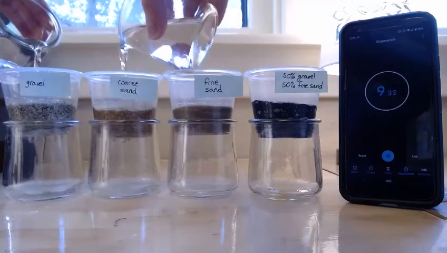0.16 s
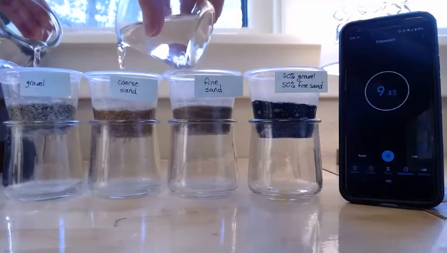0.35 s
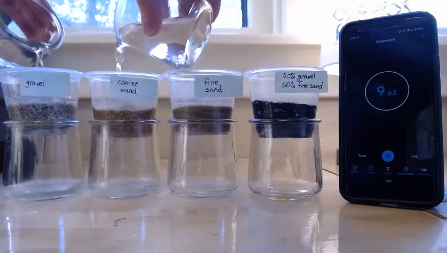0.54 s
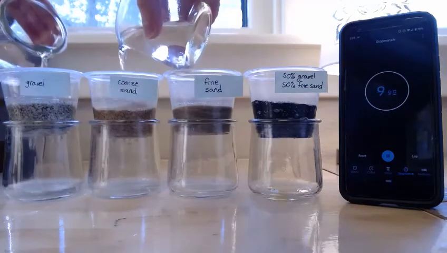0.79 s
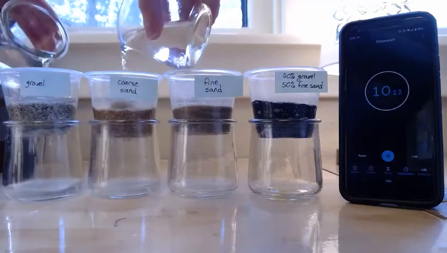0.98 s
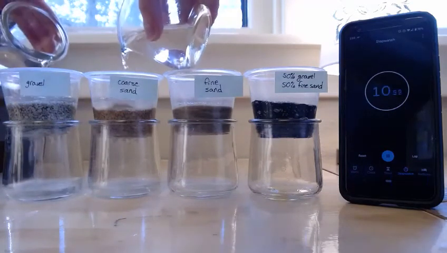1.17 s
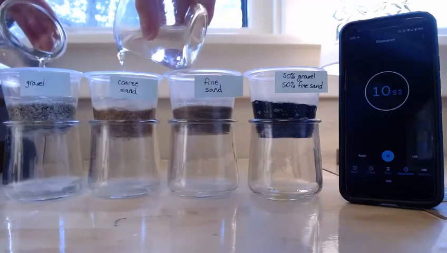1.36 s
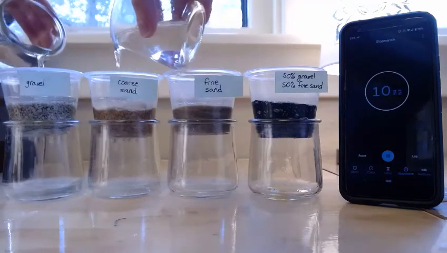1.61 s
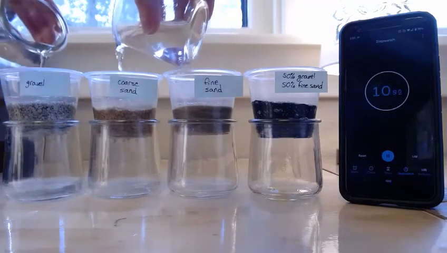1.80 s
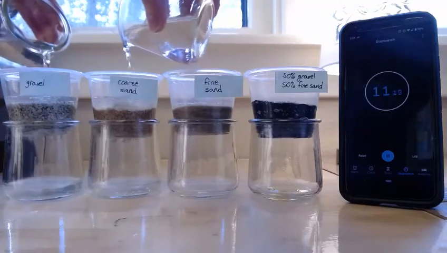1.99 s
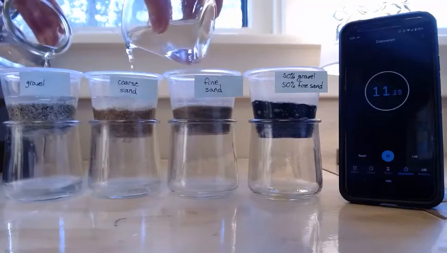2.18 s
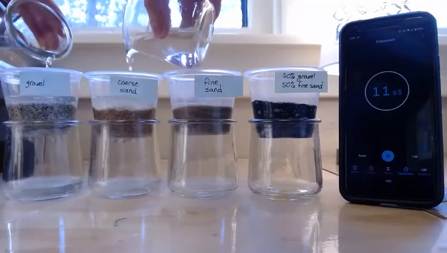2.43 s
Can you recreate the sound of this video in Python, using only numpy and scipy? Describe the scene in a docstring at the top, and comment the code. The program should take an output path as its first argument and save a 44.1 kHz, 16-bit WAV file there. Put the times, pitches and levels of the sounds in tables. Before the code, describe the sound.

Water trickles from small glass beakers onto gravel and sand in plastic cups. A few bright plops stand out, then softer drips follow and die away, close by in a small room with a faint hum.

```python
"""Thin streams of water are poured from beakers onto gravel and sand in plastic cups, close by, indoors.
From the start there are a faint appliance hum, a wavering low tone, an uneven rumble and room noise.
A trickle sets in: drops slap the surface and trap bubbles, which ring briefly and rise in pitch.
The loudest plops come near 0.3 s, 1.0 s and 1.2 s; softer ones follow and die out by 2.4 s.
A small hard room answers each one."""
import sys
import numpy as np
from scipy import signal
from scipy.fft import rfft, irfft, next_fast_len
from scipy.io import wavfile
from scipy.ndimage import uniform_filter1d

SR = 44100
rng = np.random.default_rng(int(sys.argv[2]) if len(sys.argv) > 2 else 0)


def generate_wav(sig):
    """Save sig (samples, or channels by samples) to the path in sys.argv[1] as 16-bit PCM at SR."""
    pcm = np.round(np.clip(np.atleast_2d(sig).T, -1, 1) * 32767).astype(np.int16)
    wavfile.write(sys.argv[1], SR, pcm)


N = 108045

# Spectrum of the steady room noise: f/Hz, relative density/dB
AIR_SPECTRUM = [(65, -11.5), (110, -1.5), (292, -3.5), (401, -9.5), (462, -7.5), (562, -12), (1270, -20.5),
                (1980, -17.5), (2440, -31), (6830, -39), (7600, -50), (9880, -69.5), (16700, -120)]
AIR_DB = -63


def amp(db):
    """The decibel scale: 20 dB is a tenfold amplitude."""
    return 10 ** (np.asarray(db) / 20)


def unit(x):
    """Normalisation to rms 1."""
    return x / np.sqrt(np.mean(x ** 2) + 1e-20)


def along(points, hz):
    """Interpolation of (f/Hz, value) points on a logarithmic frequency axis."""
    f, values = np.transpose(points)
    return np.interp(np.log(hz + 1), np.log(f + 1), values)


def curves(rows):
    """Linear interpolation in time: one value per sample for each column after t/s."""
    times, *columns = np.transpose(rows)
    return [np.interp(np.arange(N) / SR, times, column) for column in columns]


def filtered(x, response):
    """Linear filtering: the spectrum of x is multiplied by a frequency response."""
    size = next_fast_len(N + 8192)
    return irfft(rfft(x, size) * response(np.fft.rfftfreq(size, 1 / SR)), size)[..., :N]


def noise(spectrum):
    """Spectral shaping: coloured noise of rms 1 that falls away outside the given points."""
    closed = [(spectrum[0][0] * .5, -120), *spectrum, (spectrum[-1][0] * 2, -120)]
    return unit(filtered(rng.standard_normal(N), lambda hz: amp(along(closed, hz))))


def narrow(centre_hz, width_hz):
    """Resonance: noise in one narrow band is heard as an unsteady tone (rms 1)."""
    return unit(filtered(rng.standard_normal(N), lambda f: 1 / (1 + (2 * (f - centre_hz) / width_hz) ** 2)))


def lay(onsets, shapes):
    """Superposition: the rows of shapes add, each from its own onset in seconds."""
    at = np.round(onsets * SR).astype(int)[:, None] + np.arange(shapes.shape[1])
    return np.bincount(at.ravel(), shapes.ravel(), N + SR)[:N]


def appliance_hum():
    """Narrow-band noise: an appliance hums in two faint, unsteady tones."""
    # Hum tones: f/Hz, rms level/dB, bandwidth/Hz
    tones = [(457.5, -69, 9.9), (495.8, -73, 9)]
    return sum(amp(db) * narrow(hz, width_hz) for hz, db, width_hz in tones)


def wavering_tone():
    """Amplitude modulation: a low tone swells and fades."""
    # Envelope of the tone: t/s, level/dB
    envelope = [(0.0, -79.5), (0.49, -62.5), (0.5, -70.5), (1.23, -65.5), (1.28, -79), (1.46, -56),
                (1.49, -64.5), (1.64, -74.5), (1.92, -59), (2.19, -75), (2.29, -57), (2.45, -82)]
    return amp(curves(envelope)[0]) * narrow(centre_hz=297, width_hz=16)


def rumble():
    """Superposition of low Gaussian tone bursts and broad low noise makes an uneven rumble."""
    # Low swells: centre t/s, peak level/dB, f/Hz, half-width/s
    bursts = [(.05, -57, 58.4, 0.017), (.2, -58, 59.6, 0.016), (0.279, -48.5, 130, 0.022),
              (.39, -45.5, 56.5, 0.05), (0.501, -36, 58, 0.014), (0.662, -50, 77, 0.02),
              (0.831, -46.5, 132, 0.012), (0.822, -53.5, 60, .03), (0.959, -40, 50.6, 0.035),
              (1.081, -45.5, 58, 0.091), (1.201, -38, 54.2, 0.041), (1.26, -47.5, 94, 0.04),
              (1.381, -40, 78, 0.01), (1.478, -39.5, 59.8, 0.036), (1.569, -37.5, 58.2, 0.016),
              (1.699, -43.5, 95.7, 0.039), (1.829, -43, 67, 0.015), (1.971, -49.5, 53.3, 0.024),
              (2.06, -45.5, 69, 0.032), (2.238, -41.5, 58, 0.019), (2.369, -48, 61, 0.01)]
    # Spectrum of the low noise: f/Hz, relative density/dB
    spectrum = [(20, -5), (35, -7), (55, -1), (100, -1.5), (140, -7.5), (200, -16.5), (260, -41.5)]
    centre, db, hz, half_width = np.transpose(bursts)[:, :, None]
    t = np.arange(N) / SR - centre
    phase = 2 * np.pi * (hz * t + rng.random(centre.shape))
    swells = amp(db) * np.exp(-(t / half_width) ** 2) * np.sin(phase)
    return swells.sum(0) + amp(-54.5) * noise(spectrum)


def background_noise(flicker_db=4.5):
    """Random modulation: steady room noise gets a faint, watery flicker like that of compressed audio."""
    cells = signal.stft(noise(AIR_SPECTRUM), nperseg=512)[2]
    flicker = uniform_filter1d(rng.standard_normal(cells.shape), 3, axis=0)
    flicker = uniform_filter1d(flicker, 10, axis=1)
    return amp(AIR_DB) * signal.istft(cells * amp(flicker_db * unit(flicker)), nperseg=512)[1][:N]


def ring(onsets, db, hz, t60, size):
    """Bubble resonance: trapped air rings as a damped sine that starts softly and rises in pitch."""
    rise_per_t60, attack_s = 0.02, 0.0015
    t = np.arange(size) / SR
    hz, t60 = hz[:, None], np.clip(t60, .003, .036)[:, None]
    phase = 2 * np.pi * hz * (t + rise_per_t60 * t * t / (2 * t60))
    decay = amp(db[:, None] - 60 * t / t60)
    attack = 1 - np.exp(-(t / attack_s) ** 2)
    return lay(onsets, decay * attack * np.sin(phase))


def swarm(per_s, centre_hz, spread, t60_cycles, scatter_db):
    """A Poisson process of small bubbles with log-normal pitches, rms 1."""
    gap, radius, angle, strength = rng.random((3500, 4)).T
    onsets = np.cumsum(-np.log(1 - gap)) / per_s
    gaussian = np.sqrt(-2 * np.log(1 - radius)) * np.cos(2 * np.pi * angle)
    hz = centre_hz * np.exp(spread * gaussian)
    db = -scatter_db * np.log(1 - strength)
    heard = onsets < N / SR
    return unit(ring(onsets[heard], db[heard], hz[heard], t60_cycles / hz[heard], size=800))


def trickle():
    """Smaller bubbles resonate higher: three swarms make the trickle between the plops."""
    # Swarm envelopes: t/s, then relative level/dB of fizz, fine spray and small bubbles
    envelopes = [(0.0, -80, -75, -90), (0.17, -55.5, -67, -70), (0.2, -63.5, -72.5, -76),
                 (0.23, -60, -61.5, -67.5), (0.26, -85, -75, -63.5), (0.29, -49, -57, -65),
                 (0.33, -80, -65, -79.5), (0.4, -71, -83, -61), (0.6, -56, -55.5, -41.5),
                 (0.71, -87, -84.5, -84), (0.82, -64.5, -88.5, -55), (0.9, -71, -68, -59),
                 (0.95, -41.5, -56, -37), (0.96, -55.5, -97, -64.5), (0.97, -40, -40, -59),
                 (1.02, -52, -56, -63.5), (1.11, -53, -63, -56.5), (1.17, -92, -72, -63),
                 (1.19, -74, -67, -67), (1.21, -52, -57, -57), (1.24, -62, -69, -53), (1.27, -57, -58, -67),
                 (1.36, -53.5, -55, -46), (1.46, -64, -83.5, -68), (1.58, -57, -90, -52),
                 (1.73, -70, -83, -53), (1.75, -56, -77, -58), (1.86, -76, -73, -57),
                 (1.93, -68, -68, -45.5), (1.94, -79, -72, -38), (2.0, -66.5, -73, -55.5),
                 (2.1, -69, -70.5, -50.5), (2.15, -53, -51, -40.5), (2.27, -93, -92, -86),
                 (2.37, -60.5, -81, -75), (2.45, -74.5, -94, -77)]
    fizz_db, spray_db, small_db = curves(envelopes)
    small = swarm(per_s=400, centre_hz=1942, spread=.057, t60_cycles=30, scatter_db=6)
    fizz = swarm(per_s=1300, centre_hz=3300, spread=.2, t60_cycles=40, scatter_db=2)
    spray = swarm(per_s=1300, centre_hz=5700, spread=.17, t60_cycles=65, scatter_db=2)
    return amp(small_db - 11.5) * small + amp(fizz_db - 8.5) * fizz + amp(spray_db - 12.5) * spray


def plops():
    """Air entrainment: drops trap loud bubbles, and a brood of lesser ones breaks off each."""
    # Loud bubbles: t/s, relative level/dB, f/Hz, t60/s (ring caps it at 0.036 s)
    bubbles = [(0.0682, -59.5, 2210, 0.052), (0.1386, -51, 2010, 0.029), (0.157, -45, 1930, 0.023),
               (0.1775, -40, 1904, 0.019), (0.2134, -28.5, 1606, 0.018), (0.2284, -41, 1510, 0.035),
               (0.2493, -33, 1870, 0.021), (0.2713, -14.5, 1841, 0.021), (0.3174, -48.5, 2020, 0.02),
               (0.3274, -56, 1786, 0.019), (0.4264, -46, 1824, 0.033), (0.4868, -38, 1865, 0.021),
               (0.5028, -40, 2006, 0.021), (0.5686, -45, 1920, 0.027), (0.5955, -35.5, 2010, 0.03),
               (0.6365, -37, 1767, 0.022), (0.6804, -33, 1677, 0.015), (0.7971, -40, 1850, 0.024),
               (0.8295, -44.5, 1856, 0.025), (0.9433, -41, 2090, 0.028), (0.9547, -31, 2015, 0.028),
               (0.9722, -18.5, 1930, 0.014), (0.9884, -30.5, 1544, 0.018), (1.039, -26, 1460, 0.028),
               (1.0714, -43, 1627, 0.028), (1.0919, -35, 1814, 0.021), (1.1034, -43.5, 1665, 0.042),
               (1.2201, -36, 1410, 0.016), (1.2396, -18.5, 1437, 0.019), (1.2564, -27.5, 2010, 0.024),
               (1.2724, -47, 1260, 0.028), (1.2864, -41.5, 1160, 0.046), (1.3324, -36.5, 1170, 0.06),
               (1.3558, -32, 1977, 0.029), (1.4296, -50, 1265, 0.047), (1.5105, -46.5, 1640, 0.077),
               (1.5703, -42, 1582, 0.043), (1.6202, -51, 1595, 0.035), (1.6482, -40.5, 2037, 0.032),
               (1.6591, -52.5, 1584, 0.026), (1.7549, -51, 1540, 0.041), (1.8043, -53.5, 1486, 0.028),
               (1.8243, -49, 1453, 0.039), (1.8487, -49, 1886, 0.03), (1.8771, -51.5, 1770, 0.022),
               (1.9106, -43.5, 2090, 0.028), (1.9515, -44, 1530, 0.034), (1.9744, -45.5, 2140, 0.033),
               (2.0233, -46, 2010, 0.04), (2.0454, -44, 1450, 0.034), (2.1221, -33, 2100, 0.023),
               (2.1435, -34.5, 1206, 0.039), (2.1809, -41, 1194, 0.041), (2.2458, -44.5, 1894, 0.02),
               (2.359, -54.5, 1528, 0.069), (.2845, -27.5, 1707, 0.018), (.2995, -20.5, 1781, 0.018),
               (0.1396, -56, 2675, 0.06), (0.2294, -50, 2660, 0.046), (0.2857, -47.5, 3290, 0.034),
               (0.4713, -64.5, 2740, 0.018), (0.5038, -54, 3226, 0.042), (0.5676, -60, 2640, 0.02),
               (0.595, -78, 3880, 0.02), (0.9428, -43, 2840, 0.035), (0.9717, -40, 3423, 0.049),
               (1.038, -42, 2780, 0.02), (1.062, -43, 2650, 0.025), (1.1034, -37.5, 3740, 0.015),
               (1.1877, -37.5, 3730, 0.014), (1.2067, -25, 5040, 0.0079), (1.2194, -49.5, 5420, 0.017),
               (1.2391, -36, 2650, 0.0086), (1.3324, -40, 5200, 0.01), (1.5115, -47, 3820, 0.02),
               (1.5304, -43, 2930, 0.014), (1.5708, -40.5, 2617, 0.026), (1.6584, -43, 2560, 0.025),
               (1.731, -39, 3260, 0.012), (1.9225, -56.5, 3340, 0.06), (1.9834, -53.5, 2687, 0.043),
               (2.1435, -53.5, 4180, 0.041), (2.1804, -51, 3900, 0.02), (2.3575, -49.5, 4030, 0.015),
               (0.2838, -45.5, 6550, 0.017), (0.9048, -64.5, 6730, 0.06), (0.9717, -78, 7240, 0.02),
               (1.7499, -58, 7170, 0.04), (1.9374, -56, 7300, 0.06), (2.1086, -54.5, 6900, 0.012),
               (0.5955, -30, 1493, 0.017), (0.9433, -49.5, 1440, 0.032), (1.3553, -29.5, 1507, 0.017),
               (1.6596, -51, 1550, 0.046), (1.9744, -46, 1490, 0.023), (2.1214, -46.5, 1280, 0.055),
               (0.597, -58, 897, 0.055), (0.945, -54, 894, 0.12), (0.971, -53, 885, 0.087),
               (1.04, -50, 935, 0.084), (1.241, -35.5, 972, 0.013), (1.272, -44.5, 884, 0.06),
               (1.299, -51, 943, 0.064), (1.355, -46.5, 775, 0.049), (1.389, -46, 890, 0.017),
               (2.144, -41.5, 899, 0.065), (2.18, -44, 840, 0.022), (0.0797, -63, 5300, 0.03),
               (0.154, -55, 5090, 0.023), (0.5666, -55.5, 5020, 0.042), (1.2394, -46.5, 4780, 0.023),
               (0.9722, -26.5, 2199, 0.026), (1.4094, -56, 1990, 0.038), (2.1434, -35, 1914, 0.086),
               (2.3574, -58, 2604, 0.08)]
    count, mean_lag_s, pitch_spread, t60_ratio = 8, .022, .14, .7
    middling_db, growth, fade_db_per_s = -40, .7, 195.5  # the brood grows more slowly than its parent
    onsets, db, hz, t60 = np.transpose(bubbles)
    scatter = rng.standard_normal((len(onsets), count, 4))
    lag = mean_lag_s * (scatter[..., 0] ** 2 + scatter[..., 1] ** 2) / 2  # exponentially distributed
    brood_onsets = onsets[:, None] + lag
    brood_db = -53 + growth * (db[:, None] - middling_db) + 3 * scatter[..., 2] - fade_db_per_s * lag
    brood_hz = hz[:, None] * np.exp(pitch_spread * scatter[..., 3])
    brood_t60 = np.repeat(t60_ratio * t60, count)
    brood = ring(brood_onsets.ravel(), brood_db.ravel(), brood_hz.ravel(), brood_t60, size=1300)
    return 2 * (ring(onsets, db, hz, t60, size=2600) + brood)


def slaps(t60=0.034):
    """Impact noise: a drop striking the surface gives a burst that decays exponentially."""
    # Drop impacts: t/s, relative level/dB
    impacts = [(0.0698, -49), (0.1406, -42.5), (0.2274, -47), (0.2738, -27.5), (0.4878, -42.5),
               (0.5021, -43.5), (0.568, -46), (0.595, -36), (0.7981, -69), (0.8314, -64.5), (0.9416, -36),
               (0.9731, -19.5), (1.038, -27.5), (1.061, -35), (1.206, -31), (1.2199, -26), (1.2396, -21),
               (1.3344, -61.5), (1.3547, -49), (1.5095, -51), (1.5702, -49.5), (2.1214, -49), (2.1433, -37),
               (2.1804, -35.5), (2.359, -67)]
    # Colour of an impact: f/Hz, gain/dB
    spectrum = [(500, -5.5), (800, 2), (1300, -16), (2000, 8.5), (4000, 10.5), (5800, -24.5), (7000, 0)]
    onsets, db = np.transpose(impacts)
    t = np.arange(2000) / SR
    envelopes = amp(db[:, None] - 15.5 - 60 * t / t60)
    bursts = lay(onsets, envelopes * rng.standard_normal(envelopes.shape))
    return filtered(bursts, lambda hz: amp(along(spectrum, hz)))


def room(x, segments=24, delay_s=.006):
    """Reverberation: each frequency dies away at its own rate."""
    # Reverberation time of the small hard room: f/Hz, t60/s
    decay_times = [(500, 0.12), (2000, 0.25), (4000, 0.23), (7000, 0.067)]
    hz, t, cells = signal.stft(rng.standard_normal((segments, SR // 2)), SR, nperseg=256)
    decay = amp(-60 * t / along(decay_times, hz)[:, None])
    tails = signal.istft(cells * decay, SR, nperseg=256)[1]
    reverb, step = np.zeros(N + 2 * SR), N // segments + 1
    # Each stretch gets its own random tail, so the reverberation stays diffuse, without ringing tones.
    for k, tail in enumerate(tails):
        answer = signal.fftconvolve(x[k * step:(k + 1) * step], tail / np.linalg.norm(tail))
        start = k * step + round(delay_s * SR)
        reverb[start:start + len(answer)] += answer
    return reverb[:N]


def scene():
    """Mid-side stereo, nearly mono: a very faint, diffuse difference between left and right."""
    # Weighting of the left-right difference: f/Hz, gain/dB
    side_gain = [(60, -45.5), (100, -39), (180, -30), (300, -30), (520, -28), (880, -24.5), (1520, -36.5),
                 (2600, -30), (4450, -22.5), (7620, -10)]
    water = plops() + slaps() + trickle()
    mid = water + amp(-10) * room(water) + appliance_hum() + wavering_tone() + rumble() + background_noise()
    diffuse = room(water) + amp(AIR_DB) * noise(AIR_SPECTRUM)
    side = filtered(diffuse, lambda hz: amp(along(side_gain, hz)))
    return np.array([mid + side, mid - side])


def record(dry):
    """Band limiting: the microphone path drops steeply at its band edge; faint hiss lies over all."""
    edge_hz, leak_db, hiss_db, cutoff_hz = 7420, -41.5, -93, 15500
    passed = filtered(dry, lambda hz: np.maximum(1 / (1 + (hz / edge_hz) ** 100), amp(leak_db)))
    hiss = amp(hiss_db) * rng.standard_normal(dry.shape)
    return filtered(passed + hiss, lambda hz: hz < cutoff_hz)


dry = scene()
out = record(dry)
generate_wav(out)
```